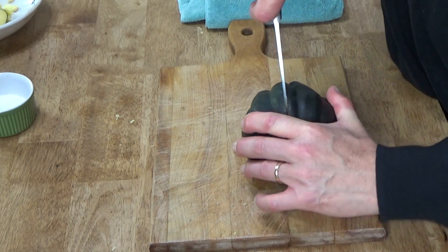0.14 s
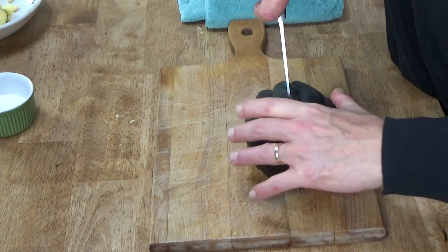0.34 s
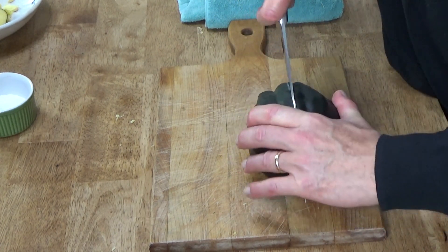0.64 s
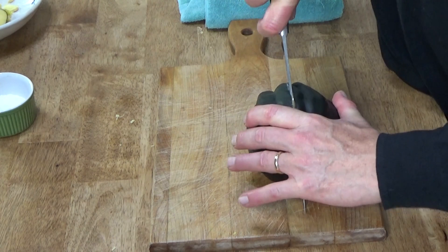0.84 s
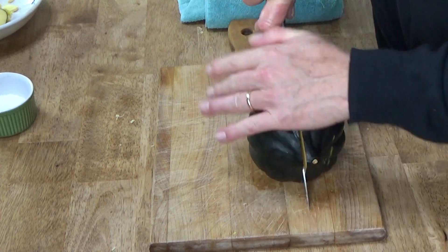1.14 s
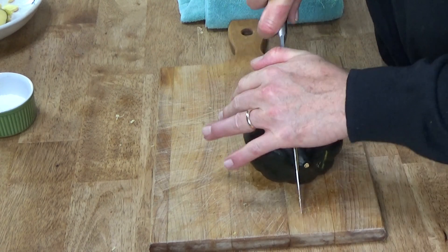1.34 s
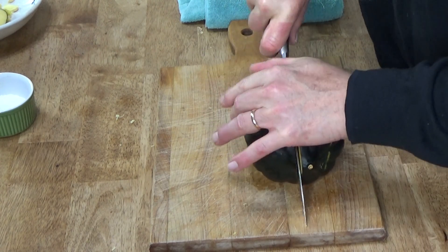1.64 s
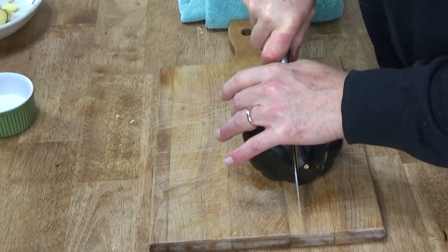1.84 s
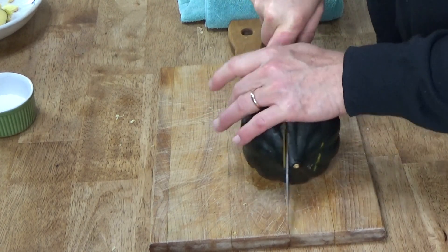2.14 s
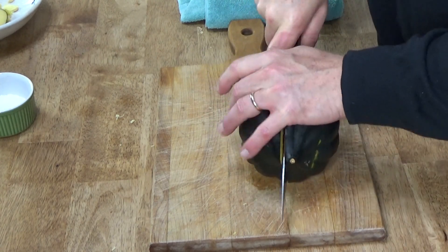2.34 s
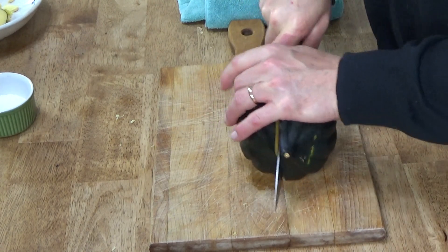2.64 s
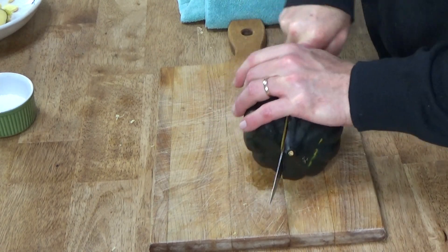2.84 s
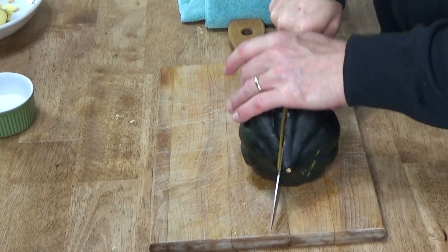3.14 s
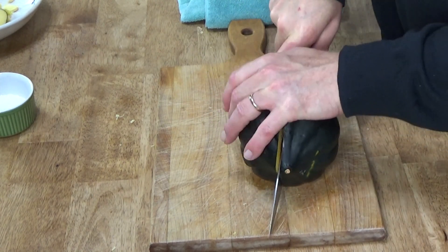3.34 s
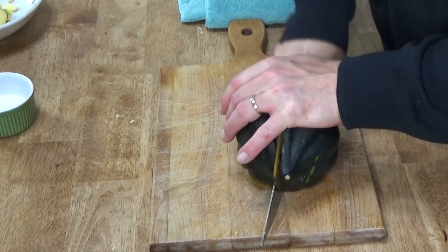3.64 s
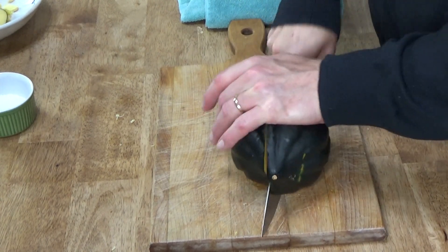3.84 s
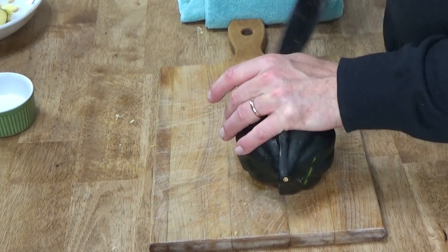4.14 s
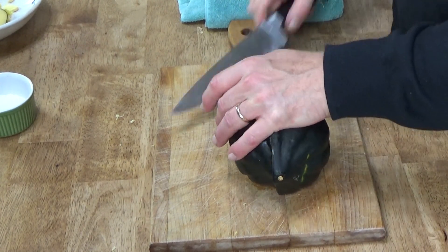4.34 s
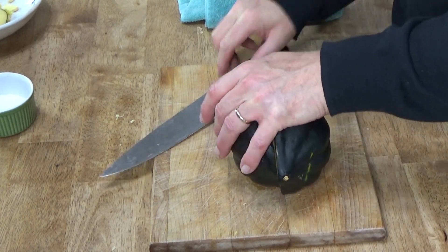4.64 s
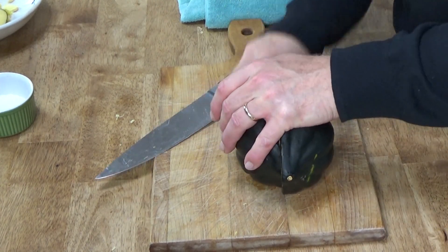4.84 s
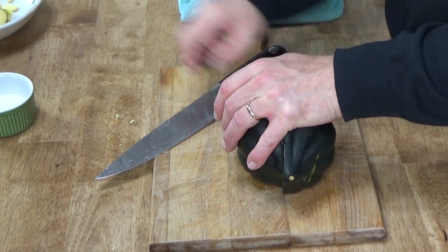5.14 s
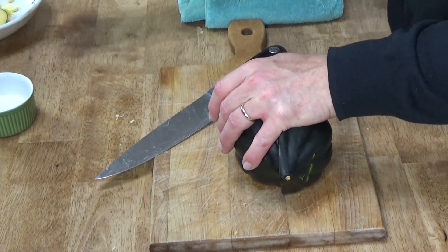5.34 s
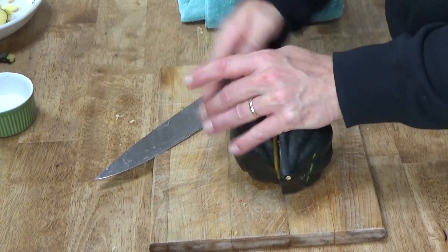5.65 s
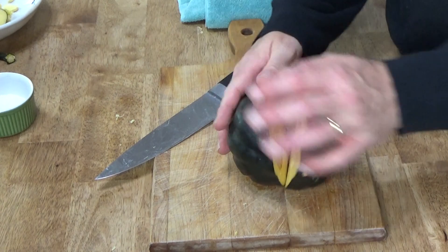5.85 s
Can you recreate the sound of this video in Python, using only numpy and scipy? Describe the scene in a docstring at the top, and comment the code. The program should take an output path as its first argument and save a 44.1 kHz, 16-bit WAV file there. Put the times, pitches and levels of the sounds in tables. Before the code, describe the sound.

A knife works through a hard squash with faint ticks and sharp cracks, slams onto a wooden board, then is laid down clattering before more rind snaps.

```python
"""A hard squash ticks and cracks under a kitchen knife, close to two microphones in a live kitchen.
Snaps of noise are the rind; short damped noise and resonances are dull thumps and the knife slamming on the board.
Clicks and long modes are the knife laid down ringing; coloured noise and an unsteady sine are slides and a squeak.
Noise bands dying at their own rates are the room, over hiss, a narrow whine and a faint pulsing whistle.
A limiter holds the loud blows."""
import sys
import numpy as np
from scipy import signal
from scipy.fft import rfft, irfft
from scipy.io import wavfile
from scipy.ndimage import uniform_filter1d, minimum_filter1d

SR = 44100
rng = np.random.default_rng(int(sys.argv[2]) if len(sys.argv) > 2 else 0)


def unload_wav(signal):
    """Save mono or channel-first audio to the path in sys.argv[1] as 16-bit WAV at rate SR, clipped to [-1, 1]."""
    wavfile.write(
        sys.argv[1],
        SR,
        np.round(np.clip(np.atleast_2d(signal).T, -1, 1) * 32767).astype(np.int16),
    )


N = 264600
TIME = np.arange(N) / SR

# Steady background hiss of room and camera: frequency_hz, density_db (per Hz, relative)
FLOOR_COLOUR = [(30, -36), (70, -25), (100, -7), (150, -16.5), (250, -18.5), (450, -12), (1000, -13.5),
                (2000, -14.5), (4000, -15), (7000, -19), (16000, -26)]
FLOOR_DB, WHINE_DB = -65, -72
# Kitchen decay: frequency_hz, t60_s
KITCHEN_T60 = [(100, 0.68), (300, 0.6463), (800, 0.68), (2000, 0.66), (5000, 0.6267), (9000, 0.62),
               (15000, 0.53)]
# Kitchen reverberation against the close sound: frequency_hz, level_db
KITCHEN_WET = [(60, -5.5), (250, -2.5), (700, 2.5), (1500, 0.5), (3000, -3), (7000, -2.5), (14000, -4)]
# Width of the kitchen: frequency_hz, side_minus_mid_db
KITCHEN_SIDE = [(100, -17.5), (300, -16), (700, -10), (1400, -6), (3000, -8), (6000, -7), (10000, -11.5),
                (14000, -28.5)]
# Inequality of the microphones: frequency_hz, left_minus_right_db
MIC_BALANCE = [(60, 0), (300, -1.5), (700, -1.4), (1500, -0.4), (4000, 0), (14000, -0.1)]
CUTOFF_HZ = 16000

# The blade slides in the cut: start_s, end_s, level_db
SLIDES = [(0.00, 0.04, -57.5), (0.70, 0.78, -55), (1.53, 1.62, -55), (1.72, 1.80, -57), (1.85, 1.93, -64.5),
          (2.20, 2.45, -70), (2.68, 2.72, -60.5), (3.52, 3.60, -49), (4.03, 4.23, -58.5)]
# The halves are dragged apart on the board: start_s, end_s, level_db
PARTING = [(5.83, 5.97, -55)]
# Friction of the wet flesh: frequency_hz, density_db (per Hz, relative)
SLIDE_COLOUR = [(200, -1.5), (800, 2), (3000, 2.5), (6000, 0.5), (10000, -8.5), (16000, -19.5)]
# Friction of the squash on the board: frequency_hz, density_db (per Hz, relative)
SHIFT_COLOUR = [(40, -26.5), (90, -1.5), (170, 0.5), (400, -5), (900, -23), (3000, -42.5), (12000, -84.5)]
# The wedged blade squeaks faintly: time_s, pitch_hz, level_db
SQUEAK = [(2.25, 4850, -100), (2.282, 4890, -69), (2.341, 5020, -62), (2.37, 5850, -69), (2.41, 6200, -67),
          (2.44, 6350, -100)]

# Dull thumps on the board: the squash rocks, jolts as it cracks, or its halves drop:
# start_s, level_db, contact_resonance_hz
THUMPS = [(0.002, -51, 650), (0.147, -56, 560), (0.267, -59.5, 262), (0.52, -58.5, 199), (0.999, -51, 374),
          (1.902, -59, 444), (2.160, -61.5, 150), (2.724, -43.5, 130), (2.805, -43.5, 439),
          (3.238, -56.5, 390), (3.341, -54, 450), (3.577, -31.5, 185.5), (3.618, -30.5, 240)]
ROLL_S, ROLL_DB = 0.067, -13.5  # short rumble with each thump: length, level against the thump
THUMP_TILT = -7  # soft and dull, dB per octave
# The knife comes down with its full weight: start_s, level_db, loss_per_bounce_db
SLAMS = [(3.6129, -12.5, 1.1), (4.6276, -13.5, 3)]
BOUNCE_COUNT, BOUNCE_S = 4, 0.0148  # contacts in each slam, time between them
SLAM_HZ, BOUNCE_SOFTENING = 930, 0.7  # resonance of the first contact, factor at each next one
SLAM_TILT = 0.52  # hard contact, dB per octave
# Dense ring of board and counter: frequency_hz, density_db (per Hz, relative)
WOOD_COLOUR = [(40, -29), (90, -29.5), (170, -15), (300, -3), (550, -0.5), (1000, -1.5), (1600, -6),
               (3100, -11.5), (5500, -19), (8000, -33.5), (10200, -27.5), (12500, -53), (16000, -66)]
# Some resonances of the thuds, from board and room: frequency_hz, level_db (relative)
THUD_RESONANCES = [(299, -31), (382.2, -36.5), (486, -31.5), (592.2, -37), (662.1, -43.5), (855.9, -39),
                   (975, -30.5), (1211, -32.5), (1270, -26.5), (1308, -44)]

# Steel strikes wood: start_s, click_db, click_centre_hz, ring_db
BLADE_HITS = [(3.6124, -12, 2400, -38.5), (4.4545, -24, 3700, -28.5), (4.5256, -25, 3300, -26.5),
              (4.542, -29, 4600, -27.5), (4.5593, -36.5, 3600, -29.5), (4.5757, -24.5, 3200, -33),
              (4.5873, -22.5, 3700, -25.5), (4.6275, -21, 2000, -27.5), (4.6862, -24, 5600, -26.5),
              (4.727, -27, 3840, -44.5)]
CLICK_OCTAVES, CLICK_MS = 1.27, 4.7  # width between band edges, decay constant
TAP_DB, TAP_HZ, TAP_TILT = -3, 327, -0.3  # board's answer: level against click, resonance, dB per octave
# Clearest modes of the blade: frequency_hz, level_db (relative)
BLADE_MODES = [(1836, -47), (2030, -48), (2815, -44), (3025, -42), (3381, -46.5), (3784, -37), (4619, -44),
               (5335, -51.5), (5862, -61.5), (6368, -47.5), (6810, -49.5), (7375, -45.5), (7677, -54.5),
               (7930, -50), (8952, -57), (10110, -46), (10815, -59), (10939, -57.5), (11375, -49.5),
               (12974, -61.5)]
BLADE_T60_S = 0.4
RATTLE_DB = -4  # dense upper modes against the clear ones

# The rind snaps and jolts the board:
# start_s, snap_db (last jump), snap_low_hz, snap_high_hz, run_ms (short runs snap once), thud_db,
# contact_resonance_hz
CRACKS = [(0.411, -44.5, 600, 4800, 2.5, -44, 377), (0.7668, -49, 2200, 5900, 0, -34.5, 338),
          (0.932, -43, 2300, 6000, 2, -45.5, 380), (1.1855, -45.5, 900, 9000, 3, -45, 910),
          (1.231, -46, 750, 5960, 0, -41, 900), (1.6052, -54, 1900, 7500, 2, -34, 590),
          (2.1722, -61, 1700, 8000, 0, -68, 170), (2.7085, -25, 1950, 7000, 13.5, -31.5, 410),
          (3.4036, -28, 1300, 2630, 0, -25, 814), (3.577, -18.5, 1090, 6800, 0, -35, 250),
          (3.5882, -26, 1800, 8500, 7.5, -31.5, 300), (3.936, -39.5, 1500, 4180, 0, -57, 795),
          (5.439, -39, 2800, 7200, -1, -53.5, 700), (5.4984, -17, 1070, 3550, 3.5, -28.5, 990),
          (5.6116, -24, 1300, 4650, 0, -38.5, 1000), (5.696, -30, 950, 3300, 0, -39.5, 1000)]
CRACK_MS = 1.8  # decay constant of the burst in each crack
JUMP_MS, JUMP_GROWTH_DB = 6.5, 3.5  # a running crack jumps about this often, louder each time
JOLT_TILT = -2.57  # board brightness for a snap of -40 dB, dB per octave
TILT_PER_SNAP_DB = 0.2242  # a stronger snap jolts more brightly: dB per octave for each dB
# A longer crackling tear of the rind just before the blade slams down
TEAR_S, TEAR_DB, TEAR_MS, TEAR_LOW_HZ, TEAR_HIGH_HZ = 3.595, -25.5, 10, 1800, 10100


def from_db(db):
    """Turn decibels into an amplitude factor."""
    return 10 ** (np.asarray(db) / 20)


def rms_one(x):
    """Scale a signal to rms 1."""
    return x / np.sqrt(np.mean(x ** 2) + 1e-20)


def unit_blow(x):
    """Scale a blow to the energy of 10 ms at rms 1."""
    return x * np.sqrt(SR / 100 / (np.sum(x ** 2) + 1e-20))


def at_hz(points, hz):
    """Read a table on a log-frequency axis."""
    table_hz, values = np.array(points).T
    return np.interp(np.log(np.maximum(hz, 1)), np.log(table_hz), values)


def coloured(x, spectrum):
    """Weight the frequencies of a signal by a table in dB."""
    size = x.shape[-1]
    hz = np.arange(size // 2 + 1) * SR / size
    return irfft(rfft(x) * from_db(at_hz(spectrum, hz)), size)


def band(x, low_hz, high_hz):
    """Causal band-pass."""
    high_hz = min(max(high_hz, low_hz * 1.02), 0.45 * SR)
    return signal.sosfilt(signal.butter(2, [low_hz, high_hz], "band", fs=SR, output="sos"), x)


def add(track, s, sound):
    """Mix a sound in at time s."""
    start = max(round(s * SR), 0)
    track[start:start + len(sound)] += sound[:N - start]


def background(side_db=-9, pulsing_db=-74.5):
    """Steady hiss of room and camera, a narrow whine and a faint whistle pulsing 30 times per second."""
    mid, side = rms_one(coloured(rng.standard_normal((2, N)), FLOOR_COLOUR))
    hiss = from_db(FLOOR_DB) * (mid + from_db(side_db) * side * [[1], [-1]])
    whine = from_db(WHINE_DB) * rms_one(band(rng.standard_normal(N), 4850, 5250))
    pulses = np.maximum(np.cos(2 * np.pi * 30 * TIME), 0) ** 3
    # keep only the phase of narrow noise: a tone of even strength and wandering pitch
    narrow = band(rng.standard_normal(N), 3160, 3260)
    whistle = np.cos(np.angle(signal.hilbert(narrow)))
    return hiss + whine + from_db(pulsing_db) * rms_one(pulses * whistle)


def kitchen(x, first_echo_s=0.00087, build_s=0.0012):
    """Diffuse reverberation, dying band by band, reaches two closely spaced microphones."""
    t, hz = TIME[:SR], np.arange(SR // 2 + 1)
    white, response = rfft(rng.standard_normal((2, SR))), 0
    edges = np.geomspace(40, 18000, 19)
    onset = 1 - np.exp(-np.maximum(t - first_echo_s, 0) / build_s)
    for low, high in zip(edges, edges[1:]):
        centre = np.sqrt(low * high)
        decay = from_db(-60 * t / at_hz(KITCHEN_T60, centre))
        tails = irfft(white * ((hz >= low) & (hz < high)), SR) * onset * decay
        # each band's energy follows its share of the spectrum
        energy = np.sum(tails ** 2, axis=1, keepdims=True)
        mid, side = tails * np.sqrt(2 * (high - low) / SR / energy)
        side = from_db(at_hz(KITCHEN_SIDE, centre)) * side
        response = response + from_db(at_hz(KITCHEN_WET, centre)) * (mid + side * [[1], [-1]])
    return signal.fftconvolve(x[None], response, axes=1)[:, :N]


def strokes(rows):
    """Level curve of strokes that each swell and fade."""
    level = np.zeros(N)
    for start, end, db in rows:
        arch = 4 * (TIME - start) * (end - TIME) / (end - start) ** 2
        level += from_db(db) * np.sqrt(np.clip(arch, 0, 1))
    return level


def friction(grain_db=4):
    """Steel hisses grainily through the flesh; low noise rumbles with each thump and as the halves part."""
    unevenness = rms_one(uniform_filter1d(rng.standard_normal(N), size=60))
    grains = rng.standard_normal(N) * from_db(grain_db * unevenness)
    slide = strokes(SLIDES) * rms_one(coloured(grains, SLIDE_COLOUR))
    rolls = [(s, s + ROLL_S, db + ROLL_DB) for s, db, _ in THUMPS]
    rumble = rms_one(coloured(rng.standard_normal(N), SHIFT_COLOUR))
    return slide + (strokes(rolls) + strokes(PARTING)) * rumble


def squeak(waver=0.0065):
    """Steel sticks and slips against wet flesh: a sine at an unsteady pitch."""
    s, hz, db = np.transpose(SQUEAK)
    wander = rms_one(uniform_filter1d(rng.standard_normal(N), size=100))
    pitch = np.interp(TIME, s, hz) * (1 + waver * wander)
    tone = np.sin(2 * np.pi * np.cumsum(pitch) / SR)
    return from_db(np.interp(TIME, s, db)) * tone * (TIME > s[0]) * (TIME < s[-1])


def jumps(s, run_ms):
    """Times at which a running crack jumps ahead."""
    count = 1 + max(round(run_ms / JUMP_MS), 0)
    return s + np.linspace(0, max(run_ms, 0) / 1000, count)


def knocks():
    """Every blow that reaches the board: start_s, level_db, brightness (dB per octave), contact_hz."""
    jolts = [(jumps(s, run_ms).mean(), db, JOLT_TILT + TILT_PER_SNAP_DB * (snap_db + 40), hz)
             for s, snap_db, _, _, run_ms, db, hz in CRACKS]
    thumps = [(s, db, THUMP_TILT, hz) for s, db, hz in THUMPS]
    bounces = [(s + k * BOUNCE_S, db - k * loss_db, SLAM_TILT, SLAM_HZ * BOUNCE_SOFTENING ** k)
               for s, db, loss_db in SLAMS for k in range(BOUNCE_COUNT)]
    taps = [(s, db + TAP_DB, TAP_TILT, TAP_HZ) for s, db, _, _ in BLADE_HITS]
    return jolts + thumps + bounces + taps


def ringing(modes, t60, spread_db, detune):
    """Struck modes, detuned slightly by each contact and weighted anew where spread_db is above 0."""
    hz, level_db = np.transpose(modes)
    t = TIME[:SR // 2]
    hz = hz * (1 + detune * rng.standard_normal(len(hz)))
    strength = from_db(level_db + spread_db * rng.standard_normal(len(hz)))
    strength = strength * rng.choice([-1, 1], len(hz))
    return unit_blow(strength @ np.sin(2 * np.pi * hz[:, None] * t) * from_db(-60 * t / t60))


def board(wood_t60=0.04, ring_t60=0.093, ring_db=-12, attack_s=0.001, lowest_hz=95,
          contact_db=5, contact_octaves=0.72):
    """Each thud is dense damped ringing and a few resonances; a springy contact favours one pitch."""
    out, t, hz = np.zeros(N), TIME[:SR // 2], np.geomspace(20, 20000, 100)
    envelope = from_db(-60 * t / wood_t60) * (1 - np.exp(-t / attack_s))
    for s, db, brightness, contact_hz in knocks():
        octaves = np.log2(hz / contact_hz)
        push_db = brightness * octaves + contact_db * np.exp(-(octaves / contact_octaves) ** 2)
        wood = np.column_stack([hz, at_hz(WOOD_COLOUR, hz) + push_db])
        resonances = [(f, level + np.interp(f, hz, push_db)) for f, level in THUD_RESONANCES]
        thud = coloured(rng.standard_normal(len(t)), wood) * envelope
        ring = from_db(ring_db) * ringing(resonances, ring_t60, spread_db=0, detune=0.018)
        add(out, s, from_db(db) * unit_blow(unit_blow(thud) + ring))
    # a small board radiates little deep bass
    return signal.sosfilt(signal.butter(2, lowest_hz, "high", fs=SR, output="sos"), out)


def snap(low_hz, high_hz, length_ms, lead=0.52, rolloff=1.68):
    """A dying burst of tiny breaks, led by a sharp one if lead is above 0; the treble falls off steeply."""
    t = TIME[:SR // 16]
    burst = rng.choice([-1, 1], len(t)) * np.exp(-t * 1000 / length_ms)
    burst /= np.sqrt(np.sum(burst ** 2))
    burst[0] += lead
    soft = signal.butter(2, min(rolloff * high_hz, 0.45 * SR), fs=SR, output="sos")
    return unit_blow(signal.sosfilt(soft, band(burst, low_hz, high_hz)))


def blade(rattle_ms=12, rattle_low_hz=2000, rattle_high_hz=10500):
    """Tip, edge and handle click on the wood and set the steel ringing."""
    out, half_width = np.zeros(N), 2 ** (CLICK_OCTAVES / 2)
    for s, db, click_hz, ring_db in BLADE_HITS:
        click = snap(click_hz / half_width, click_hz * half_width, CLICK_MS, lead=0.15)
        ring = ringing(BLADE_MODES, BLADE_T60_S, spread_db=2, detune=0.0014)
        rattle = snap(rattle_low_hz, rattle_high_hz, rattle_ms, lead=0)
        add(out, s, from_db(db) * click)
        add(out, s, from_db(ring_db) * ring)
        add(out, s, from_db(ring_db + RATTLE_DB) * rattle)
    return out


def rind():
    """Fractures run through the hard skin, each a snap or a few growing ones, and one longer tear."""
    out = np.zeros(N)
    for s, db, low_hz, high_hz, run_ms, _, _ in CRACKS:
        # counted back from the last jump, the loudest
        for k, at in enumerate(jumps(s, run_ms)[::-1]):
            add(out, at, from_db(db - JUMP_GROWTH_DB * k) * snap(low_hz, high_hz, CRACK_MS))
    add(out, TEAR_S, from_db(TEAR_DB) * snap(TEAR_LOW_HZ, TEAR_HIGH_HZ, TEAR_MS, lead=0))
    return out


def scene(rind_wet_db=-1, board_wet_db=1, blade_wet_db=-1):
    """All sources lie close together in front of the microphones, each sent into the kitchen."""
    cracks, thuds, steel, rubs = rind(), board(), blade(), friction() + squeak()
    to_room = from_db(rind_wet_db) * cracks + from_db(board_wet_db) * thuds
    to_room = to_room + from_db(blade_wet_db) * steel + rubs
    return cracks + thuds + steel + rubs + kitchen(to_room) + background()


def record(dry, ceiling_db=-5.5, release_db_per_s=170):
    """Slightly unequal microphones, a fast limiter and a steep top cut."""
    left = coloured(dry[0], [(hz, db / 2) for hz, db in MIC_BALANCE])
    right = coloured(dry[1], [(hz, -db / 2) for hz, db in MIC_BALANCE])
    x = np.array([left, right])
    over_db = np.maximum(20 * np.log10(np.abs(x).max(axis=0) + 1e-9) - ceiling_db, 0)
    # the gain reduction jumps up at once and lets go at a steady rate
    release_db = release_db_per_s * TIME
    held_db = np.maximum.accumulate(over_db + release_db) - release_db
    # about 1 ms of smoothing, around each peak
    gain = uniform_filter1d(minimum_filter1d(from_db(-held_db), size=45), size=45)
    top_cut = signal.ellip(10, 0.1, 80, CUTOFF_HZ, fs=SR, output="sos")
    return signal.sosfilt(top_cut, x * gain)


dry = scene()
out = record(dry)
unload_wav(out)
```